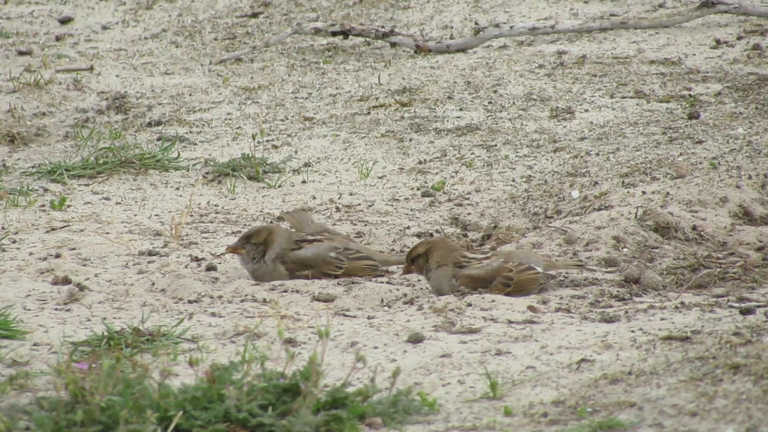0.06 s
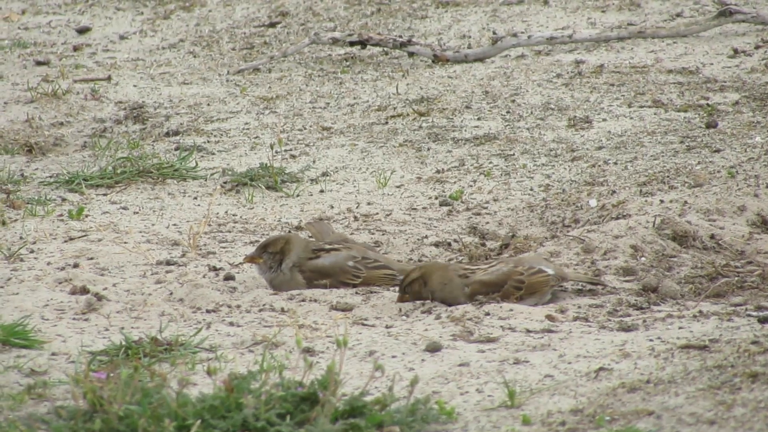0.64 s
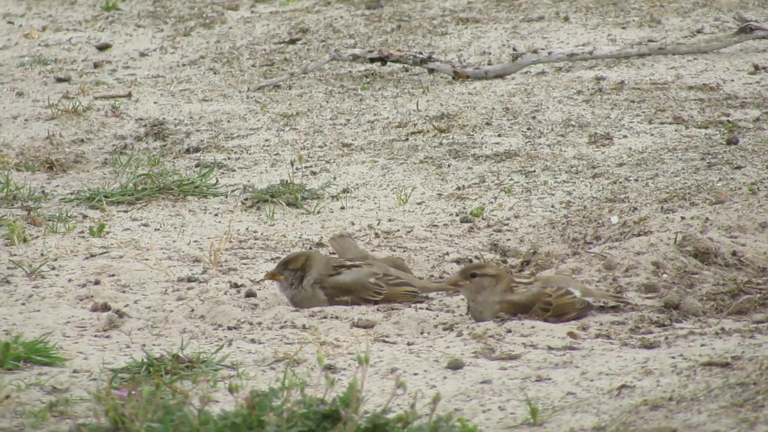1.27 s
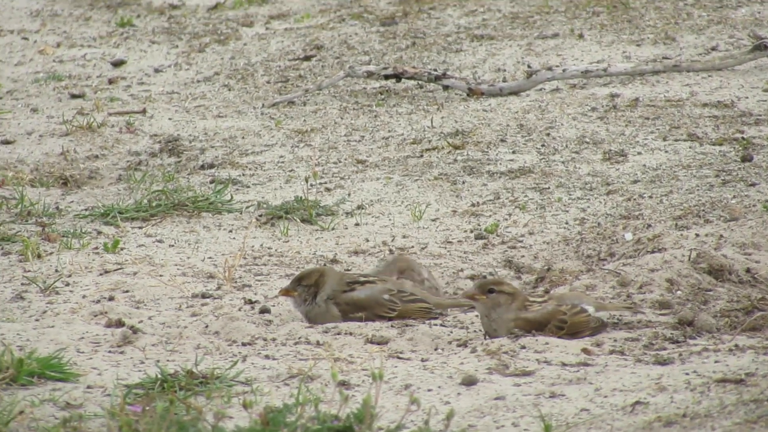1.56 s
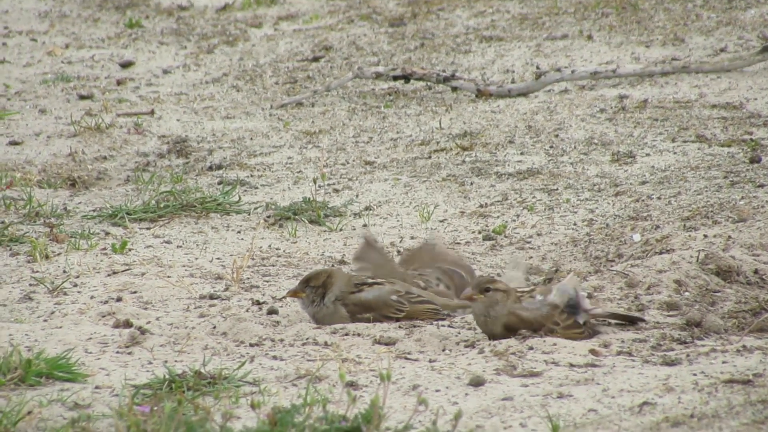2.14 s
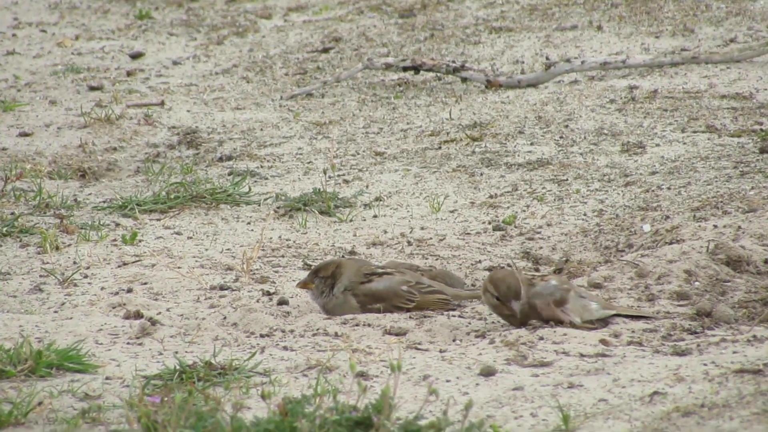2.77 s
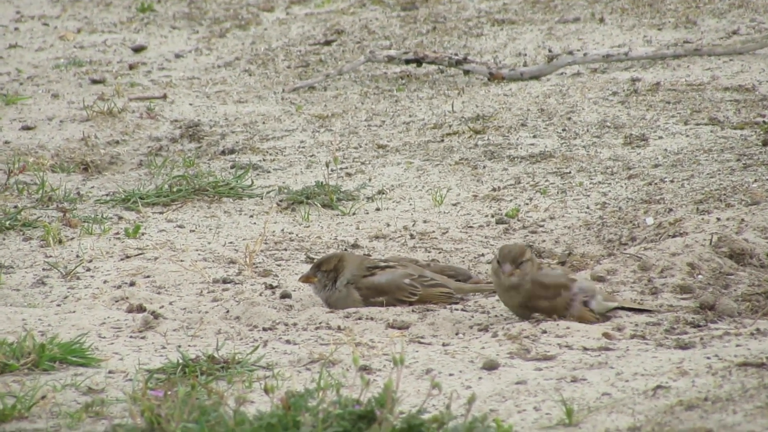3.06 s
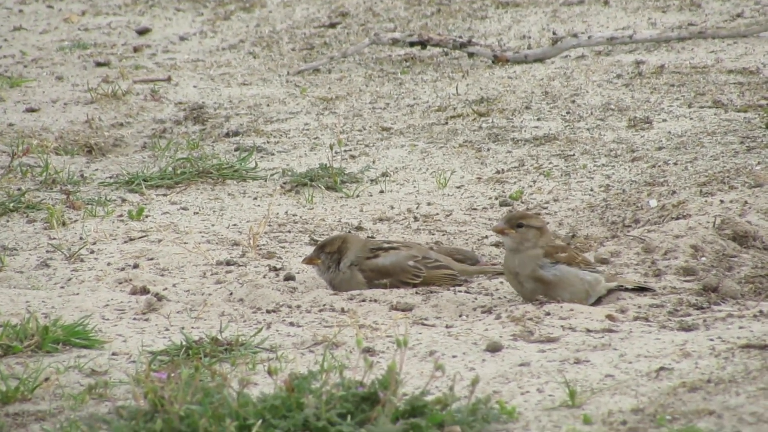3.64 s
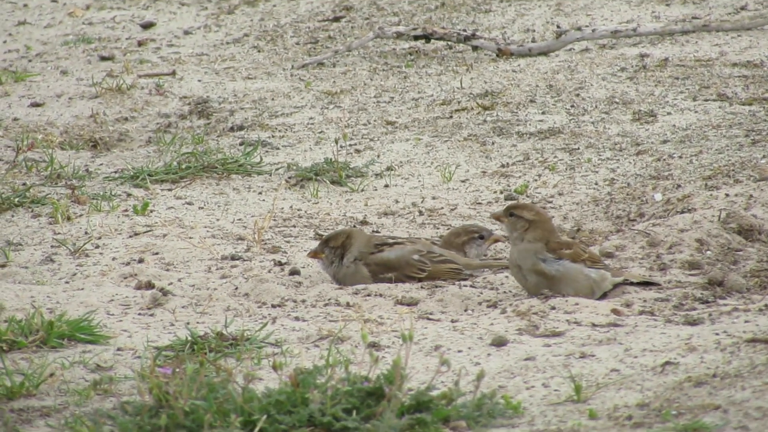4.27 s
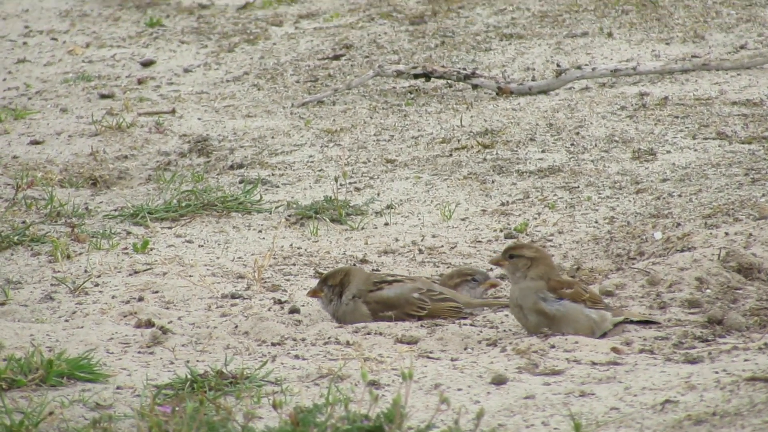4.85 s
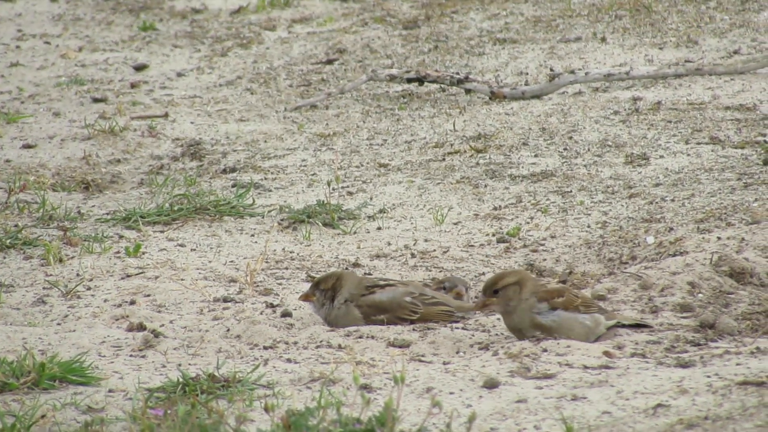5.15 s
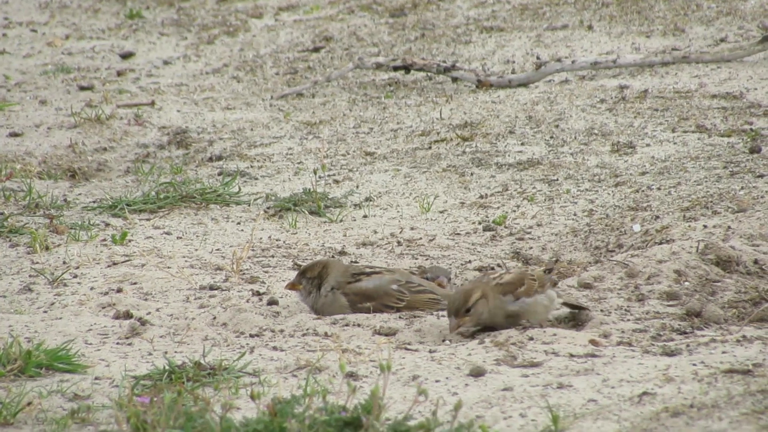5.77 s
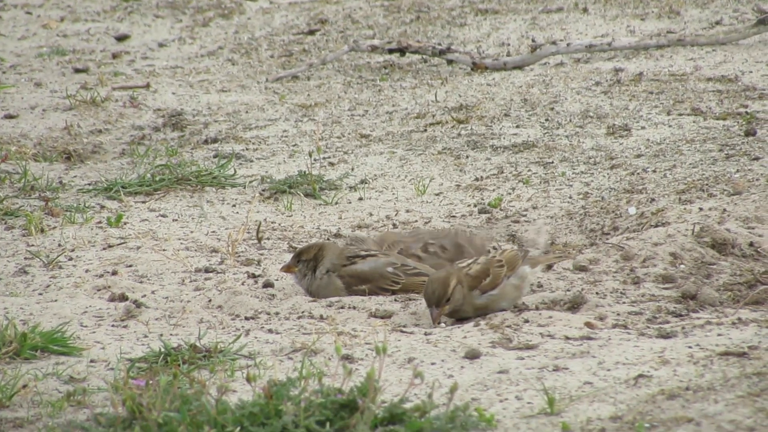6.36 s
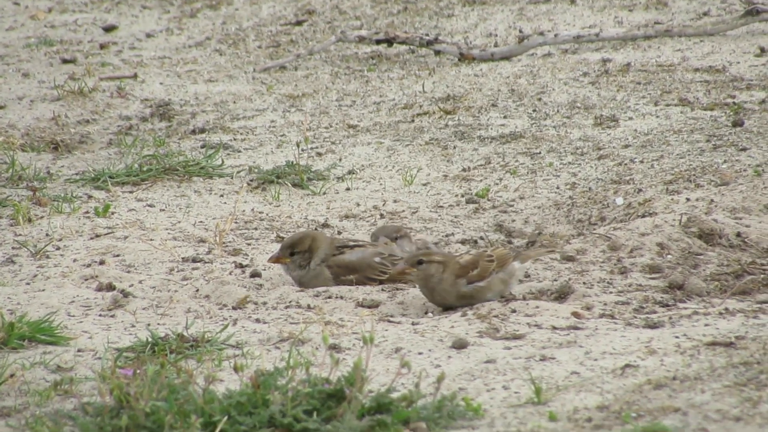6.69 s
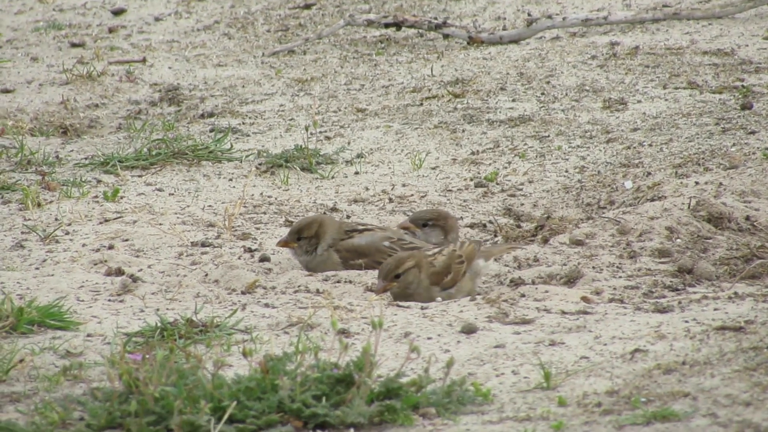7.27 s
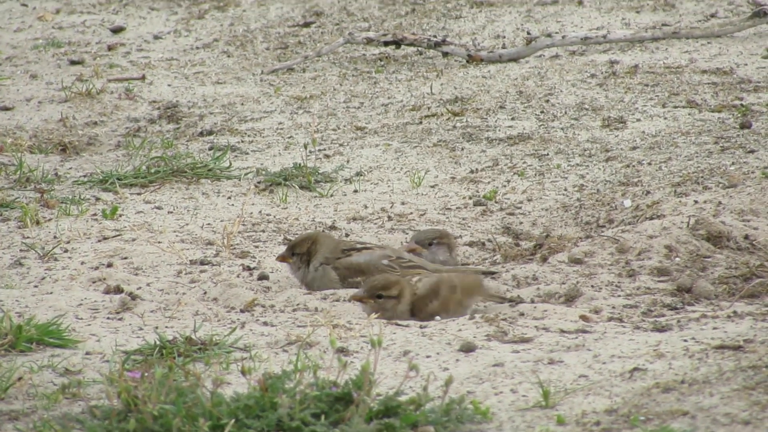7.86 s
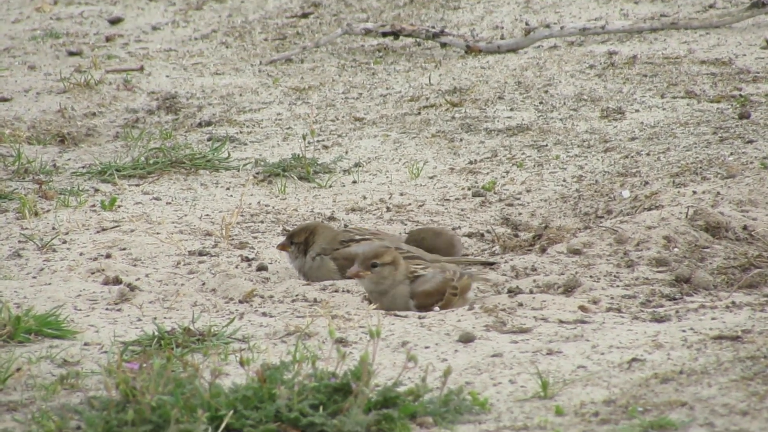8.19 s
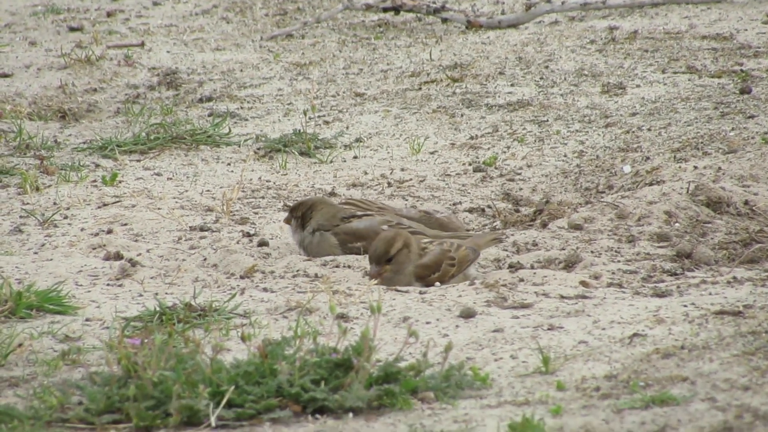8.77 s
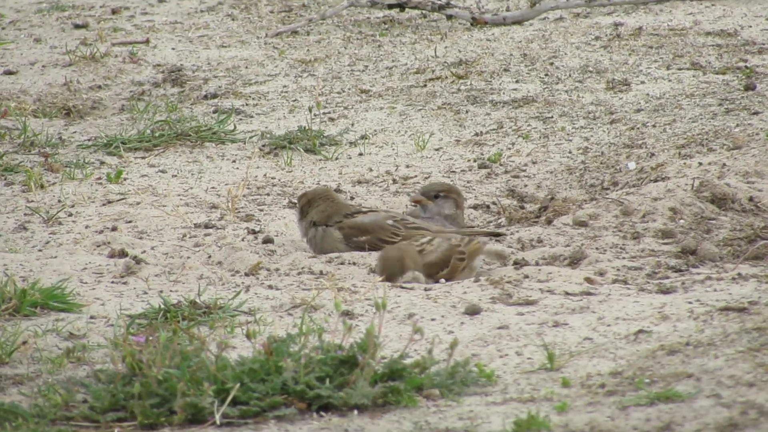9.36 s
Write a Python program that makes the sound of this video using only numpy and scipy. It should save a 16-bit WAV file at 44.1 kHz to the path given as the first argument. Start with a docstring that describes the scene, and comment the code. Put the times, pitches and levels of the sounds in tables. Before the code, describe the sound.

Sparrows squabble in short harsh calls while others chirp further off, over outdoor hiss and gusts of wind rumbling on the microphone.

```python
"""Sparrows at a dust bath

Sparrows squabble: the syrinx sounds rattles of short harsh pips that run into whistled slurs,
filtered by throat and beak. Others chirp further off over a steady outdoor roar and hiss, with a
brief rustle and a few faint clicks. Turbulent gusts buffet a stereo camera microphone, whose gain
control ducks the whole scene after the strong ones."""
import sys
import numpy as np
from scipy import signal
from scipy.fft import rfft, irfft, next_fast_len
from scipy.io import wavfile
from scipy.ndimage import uniform_filter1d

SR = 44100
rng = np.random.default_rng(int(sys.argv[2]) if len(sys.argv) > 2 else 0)


def int16_out(signal):
    """Quantize to a 16-bit WAV file."""
    q = np.round(np.clip(np.atleast_2d(signal).T, -1, 1) * 32767)
    wavfile.write(sys.argv[1], SR, q.astype(np.int16))


N = 424683
TIME = np.arange(N) / SR
SPLIT_HZ, BAND_LIMIT_HZ = 3900, 15700

# Levels in all tables are relative.
# spectra of the distant roar and the fine hiss: frequency_hz, level_db
ROAR_SPECTRUM = [(40, 9.5), (150, -1.5), (350, -0.5), (520, -3.5), (760, 2), (1000, -4), (1500, -7.5),
                 (2300, -12), (3100, -15.5), (4500, -19.5), (8000, -27), (15000, -60)]
HISS_SPECTRUM = [(200, 7.5), (2000, 3), (4500, 3.5), (7500, 3.5), (8500, 0.5), (10500, 0), (13000, -5),
                 (14500, -12), (15500, -23.5)]
# strength of the wind on the microphone: time_s, level_db
WIND_STRENGTH = [(0, -47), (.16, -23), (.46, -41), (.64, -31), (.7, -47), (1.52, -43), (1.72, -32.5),
                 (2.1, -32.5), (2.74, -19.5), (3.02, -29.5), (3.2, -33), (3.55, -13.5), (3.8, -7),
                 (4.03, -5), (4.09, -16.5), (4.14, 0), (4.21, 3.5), (4.26, -7.5), (4.4, 1.5), (4.78, -5.5),
                 (5.2, -5), (5.36, -5.5), (5.5, -10), (5.78, -17.5), (5.9, -15), (6.04, -34.5),
                 (6.2, -26.5), (6.28, -13.5), (6.68, -13.5), (6.8, -9.5), (7.3, -7), (7.46, -5), (7.8, -20),
                 (7.95, -23), (8.1, -7.5), (8.3, -11.5), (8.44, -2), (8.62, -12.5), (8.95, -8),
                 (9.36, -0.5), (9.41, -10), (9.47, -1), (9.62, -2)]
# spectra of deep eddies, faster flutter and a single buffet: frequency_hz, level_db
EDDY_SPECTRUM = [(8, -10.5), (25, -7.5), (50, 1), (90, 2), (125, -3.5), (170, -28.5), (300, -57),
                 (600, -91)]
FLUTTER_SPECTRUM = [(50, -43), (100, -14.5), (135, 2.5), (190, -3), (260, -11.5), (400, -28), (600, -42),
                    (1000, -63.5), (3000, -82), (8000, -110)]
BUFFET_SPECTRUM = [(30, -1), (100, 6.5), (220, 4.5), (350, -3.5), (550, -24.5), (900, -42), (2000, -49),
                   (6000, -70)]
# single buffets of air: centre_s, length_s, level_db, speed_ratio
BUFFETS = [(.125, 0.056, -25, 0.43), (2.378, 0.077, -19, 0.38), (2.578, 0.073, -24.5, 0.35),
           (2.69, 0.029, -6.5, 0.6), (2.812, .06, -17, 0.36), (3.625, 0.028, -5.5, 0.82),
           (3.764, 0.033, -7, 0.87), (3.863, .03, -2.5, 0.84), (4.007, 0.052, -4, 0.87),
           (4.163, .03, 5.5, 1.19), (4.398, .036, 1.5, 1.59), (4.438, 0.044, -0.5, 1.31),
           (4.597, 0.029, 2.5, 1.11), (4.965, 0.038, -0.5, 1.17), (4.983, .024, 2.5, 1.38),
           (5.134, 0.031, -5, 1.22), (5.268, 0.042, -10, .9), (5.38, 0.037, 1.5, 0.85),
           (5.899, 0.042, -10.5, 0.75), (6.282, .04, -9.5, 0.6), (6.768, 0.032, -7, 0.718),
           (6.903, 0.025, 0.5, 0.69), (7.095, 0.032, -4, 0.87), (7.373, 0.0251, 3.5, 0.58),
           (7.422, 0.027, 2.5, 0.54), (8.117, 0.038, -5, 0.534), (8.227, 0.025, -4, 0.55),
           (8.341, 0.027, 0.5, 0.53), (8.366, 0.031, -0.5, 0.59), (8.453, 0.031, 4, 0.86),
           (8.741, 0.024, 0.5, 0.61), (9.014, .026, 3, 0.66), (9.047, 0.029, 1, 0.77),
           (9.112, 0.026, 5, 0.5), (9.157, 0.025, 2, 0.84), (9.285, 0.036, 4, 0.59), (9.34, 0.028, 6, 0.58),
           (9.45, .026, 0, 1.07), (9.569, .028, 4, 1.01)]
# falling chirps of distant sparrows: start_s, length_s, first_pitch_hz, last_pitch_hz, level_db
FAR_CHIRPS = [(.022, 0.073, 4470, 3190, -53.5), (.49, .06, 3480, 2980, -52.5),
              (.612, .074, 4700, 3090, -52), (.77, 0.0496, 3400, 2900, -52.5),
              (1.059, 0.1, 4070, 2480, -47), (1.45, 0.057, 4720, 3150, -52),
              (1.843, 0.096, 3830, 2424, -46.5), (2.14, 0.068, 4360, 2930, -53.5),
              (2.257, 0.08, 4630, 3220, -54), (2.453, 0.079, 3890, 2980, -52),
              (2.712, 0.064, 3700, 3050, -50.5), (2.761, 0.082, 3880, 3030, -47.5),
              (2.907, 0.057, 4480, 3100, -53), (3.224, .053, 3450, 2987, -51),
              (3.332, 0.089, 3980, 2910, -52.5), (4.32, 0.07, 4420, 2840, -48),
              (5.155, 0.091, 4300, 2680, -49), (5.65, 0.043, 4450, 3550, -49),
              (5.698, 0.0445, 3580, 3100, -47), (5.797, 0.05, 3970, 3195, -49),
              (6.612, .072, 3500, 2630, -48), (7.044, 0.048, 3700, 2800, -44.5),
              (7.869, 0.063, 4350, 2700, -42.5), (8.265, 0.079, 4330, 3020, -55),
              (8.733, 0.057, 4370, 2730, -44), (9.292, 0.084, 3710, 2620, -45.5),
              (9.601, 0.038, 4440, 3060, -47)]
# spectrum of the rustle: frequency_hz, level_db
RUSTLE_SPECTRUM = [(400, -7), (1900, 2), (3300, -7), (5000, -7), (8000, -33), (15000, -45)]
# faint clicks: start_s, level_db
CLICKS = [(2.428, -49), (2.4696, -41), (2.6914, -49), (3.6254, -46), (3.8588, -51), (4.1614, -35),
          (4.2158, -42), (4.4014, -45), (4.984, -45), (6.9014, -45), (7.369, -41.5), (8.3669, -42.5),
          (8.4494, -38.5), (9.1102, -41.5), (9.2773, -46), (9.3427, -40)]
# spectrum of a click: frequency_hz, level_db
CLICK_SPECTRUM = [(500, -13), (2000, 0.5), (6000, 4), (11000, -7), (15000, -10)]
# transmission of throat and beak: frequency_hz, gain_db
BEAK_RESPONSE = [(600, -35), (1400, 0), (2300, -1), (3300, -0.5), (4500, 7), (5700, -6), (7000, -10),
                 (8500, -21), (10500, -36), (15000, -61)]
# runs of pips: start_s, length_s, pip_count, first_pitch_hz, last_pitch_hz, bow_hz,
# low_band_db, high_band_db, roughness (0 to 1)
RATTLES = [(3.54, 0.044, 5, 2430, 2366, 94, -37, -36, 0.48),
           (3.613, 0.012, 2, 2250, 2620, 0, -33, -48, 0.4),
           (3.643, 0.036, 4, 2520, 2200, -60, -41, -52, 0.84), (3.723, .012, 2, 2190, 2290, 0, -37, -55, 1),
           (3.964, 0.056, 6, 1293, 1426, 107, -35, -34.5, .3),
           (4.046, .049, 4, 1280, 1425, 5, -35.5, -35, .5),
           (4.669, .048, 5, 2490, 2310, 236, -40.5, -45, 0.77),
           (4.743, 0.014, 2, 2270, 2610, 0, -35, -50, 0.13),
           (4.783, 0.013, 2, 2120, 2010, 0, -34.5, -46, 0),
           (4.817, 0.022, 3, 2090, 2190, 10, -31.5, -48, 0.3),
           (4.881, 0.01, 2, 2265, 2140, 0, -34.5, -47, .85),
           (5.482, 0.016, 2, 2370, 2740, 0, -41, -51, 0.8),
           (5.52, 0.054, 6, 2330, 2490, -42, -39, -53, 0.77),
           (6.078, 0.058, 7, 1393, 1280, 258, -39, -40.5, 0.42),
           (6.463, .048, 5, 2470, 2300, 43, -36, -43, 0.39), (6.537, .012, 2, 2280, 2710, 0, -35, -49, .4),
           (6.578, .012, 2, 2300, 2150, 0, -32.5, -52, 0.08),
           (6.612, 0.039, 4, 2140, 2170, -10, -33.5, -66, 0.23),
           (6.715, 0.024, 3, 2200, 2350, -40, -40.5, -57, 0.46),
           (7.002, 0.03, 4, 1510, 1500, 45, -41, -49, 0.34),
           (7.075, .049, 4, 1385, 1440, -15, -42, -41.5, 0.35),
           (7.503, .013, 2, 2460, 2340, 0, -42, -48, .35),
           (7.586, 0.062, 6, 2130, 2080, -20, -40.5, -55, .25),
           (8.348, .024, 3, 1450, 1467, 10, -47.5, -52, .45)]
# whistled slurs: start_s, length_s, first_pitch_hz, last_pitch_hz, bow_hz,
# low_band_db, high_band_db, end_fade_db, roughness (0 to 1)
SLURS = [(3.608, .036, 2640, 2590, 12, -46, -43.5, -4, 0.06),
         (3.685, 0.036, 2132, 2324, 49, -37.5, -52, -1, 0.4),
         (4.099, 0.086, 2616, 2814, 129, -33, -33, -3, 0.06),
         (4.174, 0.036, 2790, 1840, 180, -44, -38.5, 0, 0.25),
         (4.843, 0.04, 2203, 2230, 115, -31.5, -49, -4, 0.07),
         (6.661, .045, 2190, 2230, 130, -36, -61, -2, 0.11),
         (7.126, 0.054, 1600, 1520, 46, -38, -50, 0, 0.11),
         (7.176, 0.065, 1508, 1306, 58.5, -42.5, -40.5, -8, 0.12),
         (7.656, .11, 2155, 2420, 96, -42, -58, -10, 0.14),
         (8.492, 0.081, 2125, 2370, 18, -46.5, -65, -5, 0.1),
         (8.578, .05, 2400, 2480, 20, -62, -57, -5, .2), (8.679, 0.12, 2420, 2300, -10, -63, -58, 0, .1)]
# narrow dips in the microphone's response: centre_hz, width_hz
MICROPHONE_NOTCHES = [(3930, 330), (7880, 240)]


def gain_of(db):
    """The decibel law: 20 dB is a factor of ten in amplitude."""
    return 10 ** (np.asarray(db) / 20)


def unit_rms(x):
    """Normalisation to a mean power of one."""
    return x / np.sqrt(np.mean(x ** 2) + 1e-20)


def response(spectrum, hz):
    """Gain at hz, by interpolation of decibels over log frequency."""
    knots_hz, db = np.transpose(spectrum)
    return gain_of(np.interp(np.log(hz + 1), np.log(knots_hz + 1), db))


def add(mix, start_s, sound):
    """Superposition: a sound adds to the mix from start_s on."""
    part = mix[max(round(start_s * SR), 0):][:len(sound)]
    part += sound[:len(part)]


def noise(spectrum, size=N, band_hz=(0, SR)):
    """Spectral shaping of white noise, to an rms of about one inside the band."""
    length = next_fast_len(size)
    hz = np.fft.rfftfreq(length, 1 / SR)
    shape = response(spectrum, hz)
    shape /= np.sqrt(np.mean(shape ** 2 * (hz >= band_hz[0]) * (hz <= band_hz[1])))
    return irfft(rfft(rng.standard_normal(length)) * shape, length)[:size]


def wander(size, rate_hz):
    """Linear interpolation of random values gives a drift of about unit size."""
    position = np.arange(size) * rate_hz / SR
    count = int(position[-1]) + 2
    return np.interp(position, np.arange(count), rng.standard_normal(count))


def steadied(x, window_s):
    """Division by the running rms takes the slow swells out of a noise."""
    return x / np.sqrt(abs(uniform_filter1d(x ** 2, max(int(window_s * SR), 1))) + 1e-9)


def air(roar_db=-49.0, hiss_db=-66.0, waver_db=0.74, shared=0.28):
    """Partial coherence: a distant roar is partly alike in both channels, the hiss independent."""
    roars = np.array([noise(ROAR_SPECTRUM, band_hz=(700, 1250)) for _ in range(3)])
    hiss = np.array([noise(HISS_SPECTRUM, band_hz=(9000, 13000)) for _ in range(2)])
    roar = (roars[:2] + shared * roars[2]) * gain_of(roar_db + waver_db * wander(N, 14))
    return roar + hiss * gain_of(hiss_db)


def add_buffets(flow, swing_hz=150, takeover=0.65):
    """Big pressure swings briefly take over the flow; their frequencies scale with air speed."""
    for centre_s, length_s, db, speed in BUFFETS:
        window = signal.windows.hann(int(length_s * SR))
        start_s = centre_s - length_s / 2
        swing = np.sin(2 * np.pi * (swing_hz * speed * TIME[:len(window)] + rng.random()))
        puff = unit_rms(noise(np.multiply(BUFFET_SPECTRUM, [speed, 1]), size=len(window)))
        displaced = flow[round(start_s * SR):][:len(window)]
        add(flow, start_s, -takeover * displaced * window[:len(displaced)])
        add(flow, start_s, gain_of(db) * unit_rms(window * (puff + 1.52 * swing)))


def wind(eddies_db=-0.5, flutter_db=-5.0, flutter_growth=1.59, calm_db=-48.5, common_db=-15.5):
    """Turbulent pressure drives the two channels in antiphase; only a little is common to both."""
    strength_db = np.interp(TIME, *np.transpose(WIND_STRENGTH))
    puffs_db = 6.5 * (np.tanh(wander(N, 22)) * 1.32 - .2)
    # Both short puffs and a stronger wind lift the flutter more than the eddies.
    eddy_gain = gain_of(strength_db + eddies_db + 0.81 * puffs_db)
    flutter_gain = gain_of(flutter_growth * strength_db + flutter_db) + gain_of(calm_db)
    flutter_gain *= gain_of(puffs_db)
    flows = []
    for _ in range(2):
        flow = eddy_gain * steadied(noise(EDDY_SPECTRUM), window_s=0.071)
        flow += flutter_gain * steadied(noise(FLUTTER_SPECTRUM), window_s=0.0398)
        add_buffets(flow)
        flows.append(flow)
    opposed, common = flows[0], gain_of(common_db) * flows[1]
    return np.array([common + gain_of(0.08) * opposed, common - gain_of(-0.65) * opposed])


def chirps(rows, sag=.75, quaver=0.0445, trill=0.045, trill_hz=95, flicker_db=3.0, gain_db=-1.0):
    """Frequency modulation: a tone falls, steeply at first, with a quick trill and a raspy quaver."""
    out = np.zeros(N)
    for start_s, length_s, first_hz, last_hz, db in rows:
        t = np.arange(int(length_s * SR)) / SR
        shake = trill * np.sin(2 * np.pi * (trill_hz * t + rng.random()))
        shake += quaver * wander(len(t), 1089)
        hz = (first_hz + (last_hz - first_hz) * (t / length_s) ** sag) * (1 + shake)
        flicker = unit_rms(gain_of(flicker_db * wander(len(t), 300)))
        envelope = gain_of(db) * signal.windows.tukey(len(t), .28) * flicker
        add(out, start_s, envelope * np.sin(2 * np.pi * np.cumsum(hz) / SR))
    return gain_of(gain_db) * out


def twitter(count=70, length_s=.06, first_hz=3600, last_hz=3050, relative_db=-60.5, spread=.06):
    """Independent sources: the rest of the flock chirps faintly at random moments and pitches."""
    starts_s = (np.arange(count) + rng.random(count)) * TIME[-1] / count
    rows = []
    for start_s, (detune, offset_db) in zip(starts_s, rng.standard_normal((count, 2))):
        ratio = 1 + spread * detune
        rows.append((start_s, length_s, first_hz * ratio, last_hz * ratio, relative_db + offset_db))
    return chirps(rows)


def rustle(start_s=.42, length_s=.55, level_db=-50.5, flicker_db=3.0):
    """Amplitude modulation of noise: one soft, flickering swell is heard as a rustle."""
    out, size = np.zeros((2, N)), int(length_s * SR)
    swell = signal.windows.hann(size) * gain_of(level_db + flicker_db * wander(size, 60.4))
    for channel in out:
        add(channel, start_s, swell * noise(RUSTLE_SPECTRUM, size=size))
    return out


def clicks(decay_s=0.0014, gain_db=2.0):
    """Broadband transients: noise that rises fast and decays exponentially is heard as dry ticks."""
    out, t = np.zeros((2, N)), np.arange(500) / SR
    envelope = t / decay_s * np.exp(1 - t / decay_s)
    for start_s, db in CLICKS:
        for channel in out:
            add(channel, start_s, gain_of(db + gain_db) * envelope * noise(CLICK_SPECTRUM, len(t)))
    return out


def contour(first_hz, last_hz, bow_hz, position):
    """Pitch as a linear glide plus a parabolic bow, while position runs from -1 to 1."""
    return first_hz + (last_hz - first_hz) * (position + 1) / 2 + bow_hz * (1 - position ** 2)


def syrinx(hz, low_db, high_db, rough, jitter=0.13, doubling=0.6, rasp=0.96, brighten=0.066):
    """Source and filter: harmonics pass the beak; roughness adds jitter, flutter and period doubling."""
    cycles = np.cumsum(hz * (1 + jitter * rough * wander(len(hz), 2410))) / SR + rng.random()
    orders = np.arange(1, 15)[:, None] / 2  # the doubled period supplies the half orders
    partial_hz = orders * hz
    weight = response(BEAK_RESPONSE, partial_hz) * (partial_hz < BAND_LIMIT_HZ)
    weight *= np.where(orders % 1 > 0, doubling * rough, 1)
    tilt = brighten * (high_db + 48.5)  # effort lifts the top harmonics
    weight *= np.maximum(partial_hz / SPLIT_HZ, 1) ** tilt
    upper = .5 + .5 * np.tanh((partial_hz - SPLIT_HZ) / 150)
    amplitude = 0
    for band, db in ((weight * (1 - upper), low_db), (weight * upper, high_db)):
        amplitude += gain_of(db) * band / np.sqrt((band ** 2).sum(0) / 2 + 1e-9)
    flutter = unit_rms(1 + rasp * rough * wander(len(hz), 2605))
    partials = amplitude * np.cos(2 * np.pi * (orders * cycles + rng.random(orders.shape)))
    return flutter * partials.sum(0)


def rattles(pip_s=.011, arch=0.14, swell_db_per_s=76, crest=0.21, scatter_db=1.7, gain_db=1.0):
    """Pulsed voicing: runs of pips swell and fade, hoarser at both ends; each pip arches in pitch."""
    out, size = np.zeros(N), int(pip_s * SR)
    pitch_arch = 1 + arch * (.1 - np.linspace(-1, 1, size) ** 2)
    for start_s, length_s, count, first_hz, last_hz, bow_hz, low_db, high_db, rough in RATTLES:
        for position in np.linspace(-1, 1, round(count)):
            hz = contour(first_hz, last_hz, bow_hz, position) * (1 + .026 * rng.standard_normal())
            swell_db = -swell_db_per_s * length_s * (position - crest) ** 2  # deeper in longer runs
            db = swell_db + scatter_db * rng.standard_normal()
            hoarseness = np.clip(rough + .2 * (position ** 2 - .5), 0, 1)
            pip = syrinx(hz * pitch_arch, low_db + db, high_db + db, hoarseness)
            centre_s = start_s + length_s * (position + 1) / 2
            add(out, centre_s - pip_s / 2, pip * signal.windows.hann(size))
    return gain_of(gain_db) * out


def slurs(hoarse_db=-36.0, droop=.07, droop_s=0.0045, gain_db=-2.1):
    """Sustained oscillation: notes glide, cleaner while strong; the pitch droops as the beak shuts."""
    out = np.zeros(N)
    for start_s, length_s, first_hz, last_hz, bow_hz, low_db, high_db, end_db, rough in SLURS:
        t = np.arange(int(length_s * SR)) / SR
        hz = contour(first_hz, last_hz, bow_hz, 2 * t / length_s - 1)
        hz *= 1 - droop * np.exp((t - length_s) / droop_s)
        fade_db = end_db * (t / length_s) ** 3
        edges = np.clip(np.minimum(t, t[-1] - t) / 0.0014, 0, 1)
        # A fading note breaks up and turns hoarse.
        weakness = np.clip((hoarse_db - max(low_db, high_db) - fade_db) / 8, 0, 1)
        breakup = unit_rms(gain_of(5.0 * weakness * wander(len(t), 160)))
        note = syrinx(hz, low_db + fade_db, high_db + fade_db, rough + 0.23 * weakness)
        add(out, start_s, edges * breakup * note)
    return gain_of(gain_db) * out


def direct_sound(x, left_db, lead_samples):
    """Level and time differences give direction: the left is louder by left_db and leads the right."""
    return np.array([x * gain_of(left_db / 2), np.roll(x, lead_samples) * gain_of(-left_db / 2)])


def reflections(x, scatter_db, echo_db, t60_s, echo_s=0.079, blur_s=0.03, cutoff_hz=4600):
    """Scattering from ground and plants, and one blurred echo from further away; both lose treble."""
    t = np.arange(SR // 2) / SR
    taps = rng.standard_normal((2, len(t))) * (rng.random((2, len(t))) < .06)
    scatter = taps * gain_of(-60 * t / t60_s) * (t > .003)
    echo = taps * np.exp(-np.abs(t - echo_s) / blur_s)
    tail = sum(gain_of(db) * path / np.linalg.norm(path, axis=1, keepdims=True)
               for db, path in ((scatter_db, scatter), (echo_db, echo)))
    dulled = signal.lfilter(*signal.butter(2, cutoff_hz, fs=SR), x)
    return signal.fftconvolve(dulled[None], tail, axes=1)[:, :N]


def birds():
    """Reflected share marks distance: the squabble is near and a little left, the flock far right."""
    near, far = rattles() + slurs(), chirps(FAR_CHIRPS) + twitter()
    return (direct_sound(near, left_db=2.5, lead_samples=1.8)
            + reflections(near, scatter_db=-5.5, echo_db=-17.5, t60_s=0.45)
            + direct_sound(far, left_db=-10.5, lead_samples=-2)
            + reflections(far, scatter_db=-2.0, echo_db=-19, t60_s=0.15))


def gain_control(x, ceiling_db=-7.0, knee_db=4.5, window_s=0.016, recovery_s=2.71):
    """Compression: the gain drops at once when the power passes the ceiling, then creeps back."""
    power = abs(uniform_filter1d((x ** 2).mean(0), int(window_s * SR)))
    excess_db = 10 * np.log10(power + 1e-12) - ceiling_db
    relax = np.exp(-TIME / recovery_s)
    held_db = np.maximum.accumulate((excess_db + knee_db) / relax) * relax  # decaying peak hold
    return x / gain_of(np.maximum(held_db - knee_db, 0))


def scene():
    """Superposition: the pressures of all sources add at the microphone."""
    return birds() + wind() + clicks() + rustle() + air()


def record(dry):
    """Filtering and saturation: two notches, gain control, overload on hard gusts, a band limit."""
    for hz, width_hz in MICROPHONE_NOTCHES:
        dry = signal.lfilter(*signal.iirnotch(hz, hz / width_hz, SR), dry)
    ducked = gain_control(dry)
    saturated = ducked / (1 + ducked ** 6) ** (1 / 6)
    faded = saturated * signal.windows.tukey(N, .001)
    lowpass = signal.firwin(511, BAND_LIMIT_HZ, window=("kaiser", 9), fs=SR)
    return signal.oaconvolve(faded, lowpass[None], "same")


dry = scene()
out = record(dry)
int16_out(out)
```